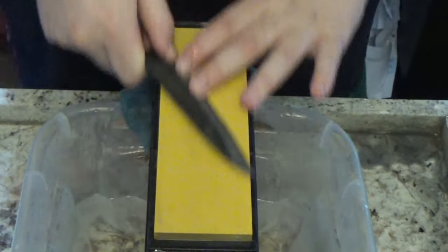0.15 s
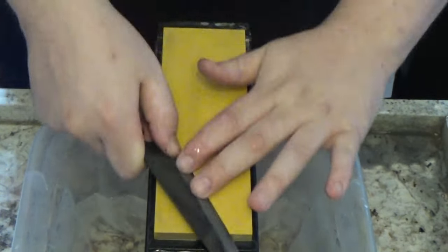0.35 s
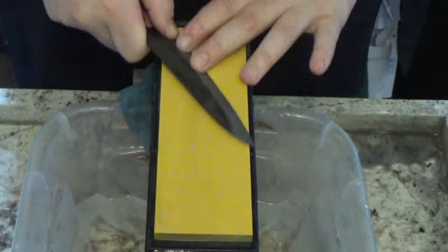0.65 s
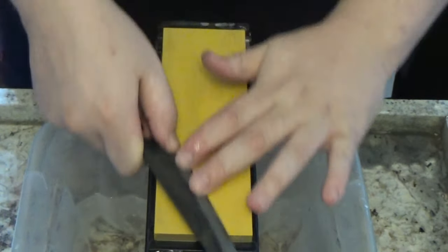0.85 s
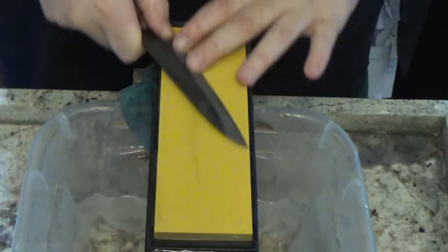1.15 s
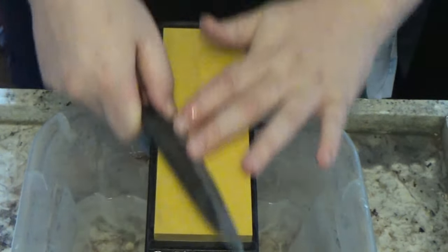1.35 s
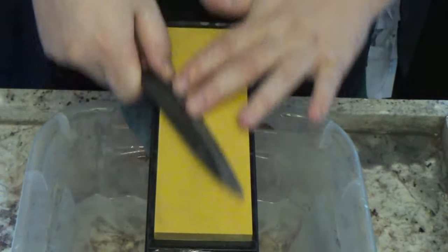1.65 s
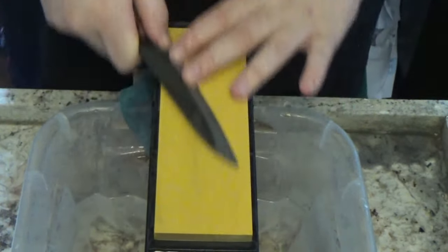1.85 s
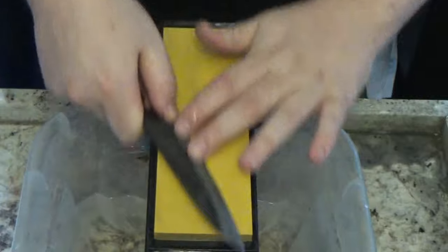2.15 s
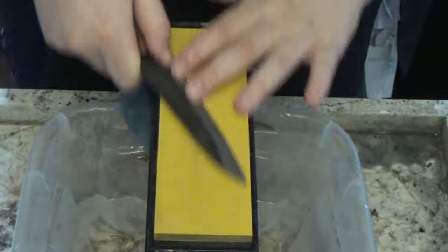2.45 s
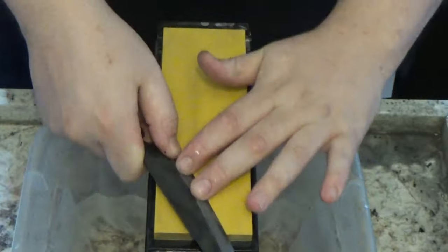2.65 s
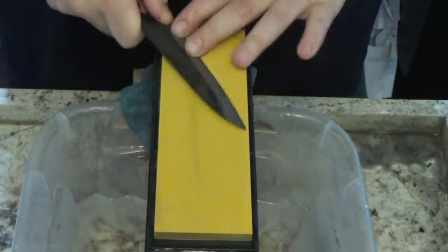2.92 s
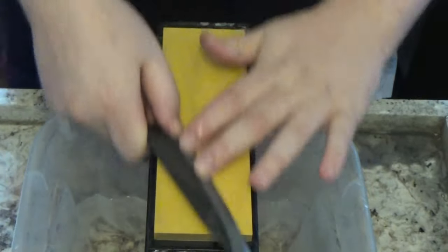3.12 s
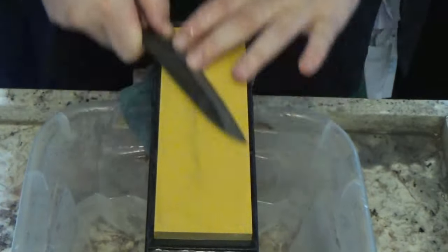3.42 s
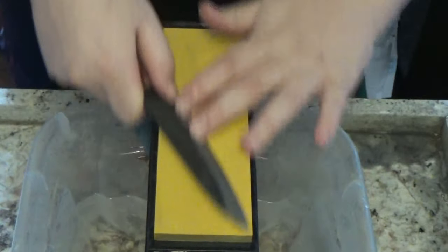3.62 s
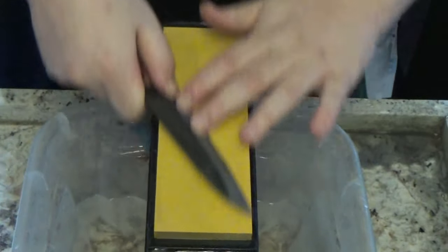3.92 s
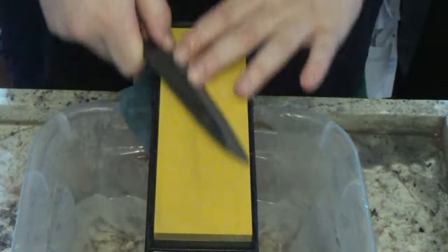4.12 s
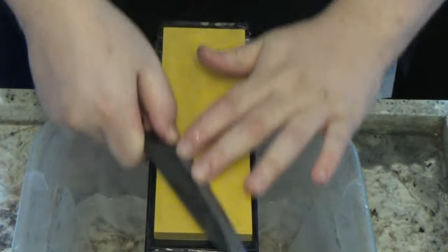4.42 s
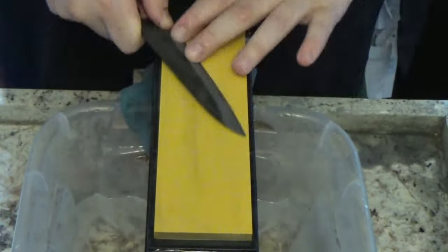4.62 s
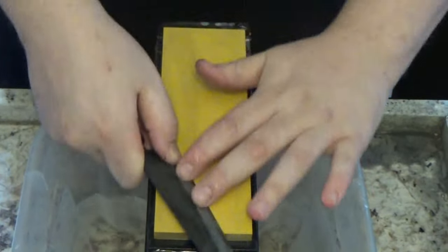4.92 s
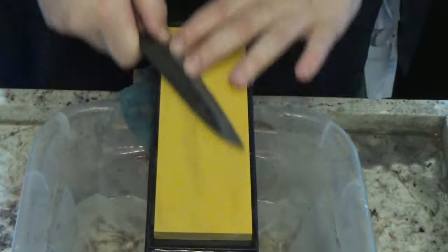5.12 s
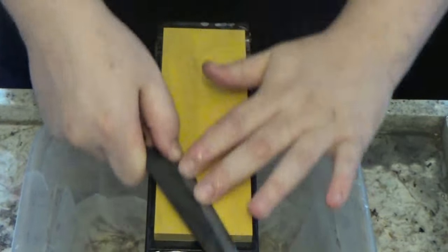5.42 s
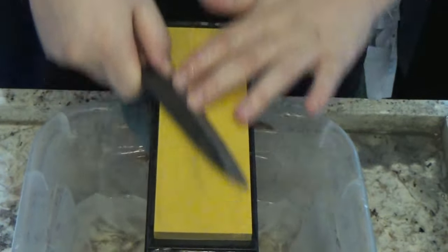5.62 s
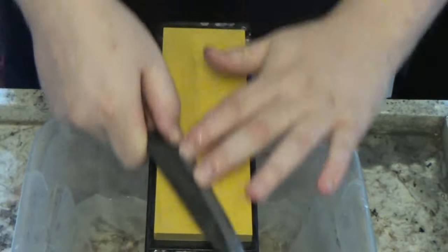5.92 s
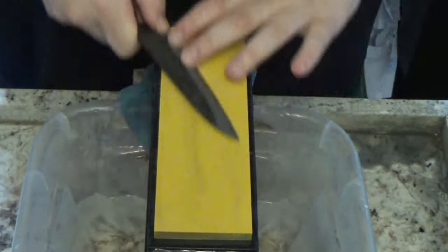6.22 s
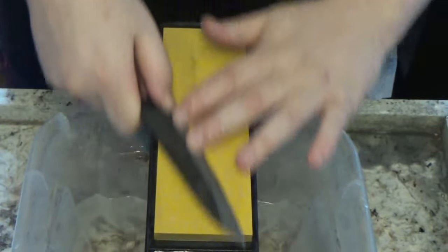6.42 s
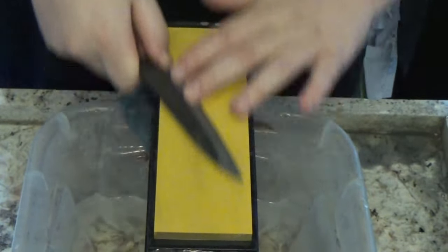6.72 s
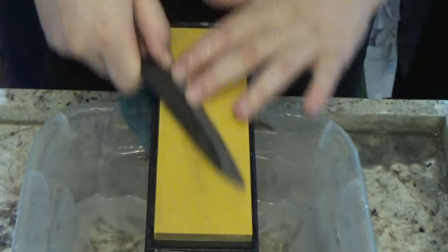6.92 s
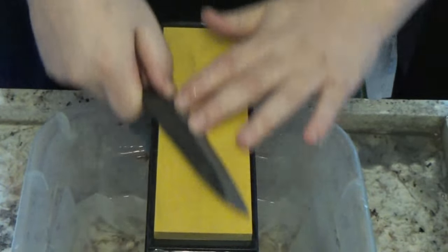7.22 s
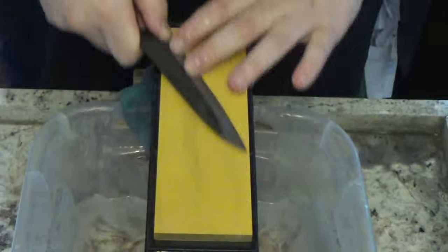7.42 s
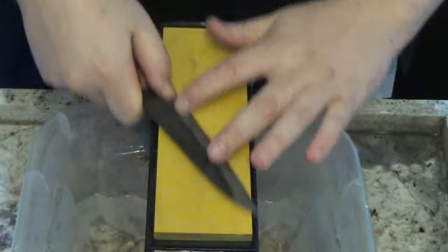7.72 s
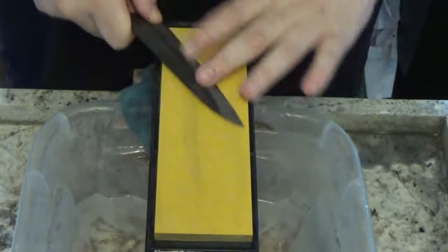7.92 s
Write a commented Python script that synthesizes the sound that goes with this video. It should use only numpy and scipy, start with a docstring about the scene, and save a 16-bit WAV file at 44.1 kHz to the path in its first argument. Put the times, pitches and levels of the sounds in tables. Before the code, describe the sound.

Close and centred, a steel blade rasps to and fro over a wet sharpening stone in a quick, even rhythm. Every push and pull swells into a hissing scrape with shifting metallic overtones, and now and then the edge catches on grit with a tiny tick. The strokes continue throughout, while a motor hums quietly in the small kitchen.

```python
"""On a kitchen counter, a knife is pushed to and fro on a wet whetstone over a plastic tub.
Grit scratches the steel and makes blade and stone ring; the ringing glides as the blade travels.
The scraping swells once in each stroke and almost stops at each turn.
Behind it a motor drones and the room rumbles softly."""
import sys
import numpy as np
from scipy import signal
from scipy.fft import rfft, irfft, next_fast_len
from scipy.io import wavfile
from scipy.ndimage import uniform_filter1d, map_coordinates

SR = 44100
rng = np.random.default_rng(int(sys.argv[2]) if len(sys.argv) > 2 else 0)


def file_out(sig):
    """Save sig as 16-bit WAV at sys.argv[1]."""
    # one column per channel
    cols = np.atleast_2d(sig).T
    # limit, then scale
    lim = np.clip(cols, -1, 1)
    pcm = np.round(lim * 32767).astype(np.int16)
    wavfile.write(sys.argv[1], SR, pcm)


N = 355446
TIME = np.arange(N) / SR


def gain_of(db):
    """Turns decibels into a number to multiply by."""
    return 10 ** (np.asarray(db) / 20)


def evened(x):
    """Scales a signal to an average power of 1."""
    return x / np.sqrt(np.mean(x ** 2) + 1e-20)


def bell(distance):
    """A smooth bump of height 1."""
    return np.exp(-np.minimum(distance ** 2, 50))


def read(points, hz):
    """Looks up values between rows of frequency and value, on a musical pitch scale."""
    row_hz, value = np.transpose(points)
    return np.interp(np.log(hz + 1), np.log(row_hz + 1), value)


def colour(x, points):
    """Turns frequencies up or down, following rows of Hz and dB."""
    size = next_fast_len(N + 4096)
    gain = gain_of(read(points, np.fft.rfftfreq(size, 1 / SR)))
    return irfft(rfft(x, size) * gain, size)[..., :N]


def wander(rate_hz):
    """A smooth random wobble of about size 1, up to roughly rate_hz times a second."""
    hz = np.fft.rfftfreq(N, 1 / SR)
    return evened(irfft(rfft(rng.standard_normal(N)) * np.exp(-(hz / rate_hz) ** 2), N))


# The tone of the rumble. Each row: frequency in Hz, relative level in dB.
RUMBLE_TONE = [(22, -3.5), (40, -12), (65, -3.5), (85, -0.5), (140, 1.5), (175, -5), (280, -5),
               (400, -10.5), (700, -11), (1000, -17.5), (2000, -22.5), (5000, -17.5), (15000, -42)]
# How alike the ears hear it. Each row: frequency in Hz, likeness from 0 to 1.
RUMBLE_LIKENESS = [(30, 0.96), (70, 1), (180, 0.98), (350, 0.81), (700, 0.65), (1500, 0.51), (6000, 0.91)]
def rumble(level_db=-48.0):
    """Steady room noise, alike in both ears in the bass."""
    left, other = rfft(rng.standard_normal((2, N)))
    likeness = read(RUMBLE_LIKENESS, np.fft.rfftfreq(N, 1 / SR))
    right = likeness * left + np.sqrt(1 - likeness ** 2) * other
    pair = irfft(np.array([left, right]), N)
    return gain_of(level_db) * evened(colour(pair, RUMBLE_TONE))


# Each row: pitch in Hz, level in dB, size of the waver in Hz.
KITCHEN_HUMS = [(58.7, -68, 2.3), (121.6, -54, 3.05), (235.3, -53, 0.12), (351, -64, 3.97)]
def hums(waver_rate_hz=10.03):
    """The kitchen's faint hums: pure tones that waver a little."""
    out = np.zeros(N)
    for hz, db, waver_hz in KITCHEN_HUMS:
        cycles = np.cumsum(hz + waver_hz * wander(waver_rate_hz)) / SR
        out += gain_of(db) * np.sin(2 * np.pi * cycles)
    return np.sqrt(2) * out


# How the motor runs. Each row: time in seconds, pitch in Hz, level in dB, overtone boost in dB.
MOTOR_RUN = [(0, 98.4, -42.5, -3), (.6, 96, -42.5, -3), (.95, 96.7, -42, -3), (1.4, 97.6, -44, -8),
             (2.101, 96.9, -42.5, -3), (2.7, 97.2, -40.5, 0), (2.95, 97.2, -40, 0),
             (3.55, 96.6, -42.5, 7.5), (3.95, 98, -43, 3), (4.951, 96.7, -42, 0), (5.4, 97.7, -42, 0),
             (5.65, 98.7, -45.5, 1), (6, 97.7, -42, 4), (6.4, 98.4, -45.5, 9), (6.8, 101.8, -50, 11.5),
             (7.1, 100.6, -45.5, 9), (7.6, 100.8, -50, 11), (8.06, 98.8, -60, 9)]
# Its tones. Each row: multiple of the pitch, relative level in dB.
MOTOR_TONES = [(1, -0.5), (2, -19), (3, -24)]
def motor(flutter_db=0.5, flutter_hz=8, waver_hz=0.38):
    """A motor drones; its pitch wanders with its speed and its tones flutter in level."""
    times, *columns = np.transpose(MOTOR_RUN)
    hz, level_db, overtone_db = (np.interp(TIME, times, column) for column in columns)
    turns = np.cumsum(hz + waver_hz * wander(8.5)) / SR
    out = np.zeros(N)
    for multiple, tone_db in MOTOR_TONES:
        db = level_db + tone_db + overtone_db * (multiple > 1) + flutter_db * wander(flutter_hz)
        out += gain_of(db) * np.sin(2 * np.pi * multiple * turns)
    return np.sqrt(2) * out


# How long the kitchen echoes. Each row: frequency in Hz, seconds to fade by 60 dB.
ROOM_FADE = [(300, .3), (1500, .26), (4000, .13), (15000, .08)]
# How loudly it echoes. Each row: frequency in Hz, level of the sound fed to the echo in dB.
ROOM_FEED = [(500, -4.5), (1500, -10), (3000, -13), (5000, -17), (7500, -20), (10000, -73), (15000, -61)]
def room(x, fade_in_s=0.0036, echoes_per_s=4000):
    """The hard kitchen sends each ear many small echoes, the treble dying first."""
    shape = (2, SR // 2)
    echoes = rng.choice([-1., 1.], shape) * (rng.random(shape) < echoes_per_s / SR)
    hz, t, spectrum = signal.stft(echoes, SR, nperseg=256)
    fade = gain_of(-60 * t / read(ROOM_FADE, hz)[:, None]) * np.tanh(t / fade_in_s)
    tail = signal.istft(spectrum * fade, SR, nperseg=256)[1]
    tail /= np.linalg.norm(tail, axis=1, keepdims=True)
    return signal.fftconvolve(colour(x, ROOM_FEED)[None], tail, axes=1)[:, :N]


# Each row: delay in seconds with the blade at the stone's far end, the same at its near end, strength.
CLOSE_ECHOES = [(.0021, 0.0012, 0.15), (.0043, 0.0029, -.22), (.0078, .0071, 0.17)]
def close_echoes(x, place):
    """Sound bounces off tub, counter and hands; the delays shift as the blade moves."""
    return sum(gain * np.interp(TIME - near - (far - near) * place, TIME, x)
               for far, near, gain in CLOSE_ECHOES)


# Each row: frequency in Hz, boost or cut in dB.
RASP_TONE = [(150, -45), (500, -16), (1100, -22.5), (2200, -18.5), (2700, -6.5), (3300, -10), (3700, -5),
             (5500, -1), (7000, -3.5), (8800, -1.5), (9800, 2.5), (12500, 2.2), (14500, -1), (15800, -10)]
def rasp(x):
    """Gives a sound the bright tone of grit on steel."""
    return colour(x, RASP_TONE)


# Each row: start in seconds, level in dB before the rasp's tone is applied, fade time in seconds.
GRAIN_CRACKS = [(1.1853, -21, .0005), (4.5915, -21, 0.00063), (5.1988, -25, .0006), (5.7545, -27, 0.00098),
                (6.0235, -28, .0012), (6.1385, -17, .0006)]
def cracks(samples=600):
    """Loose grains crack under the edge, each a tiny dying burst of noise."""
    t, out = np.arange(samples) / SR, np.zeros(N)
    for start, db, fade_s in GRAIN_CRACKS:
        burst = rng.standard_normal(samples) * np.exp(-t / fade_s)
        out[round(start * SR):][:samples] += gain_of(db) * burst
    return rasp(out)


# The strokes, pull and push by turns. Each row: start in seconds, starting place (0 near end, 1 far),
# first grab from 0 to 1, coasting time in seconds, level in dB, rise from start to end in dB,
# swell in dB, its delay in seconds, its half length in seconds, brightness in dB,
# extra brightness in the swell in dB.
ARM_STROKES = [(-0.157, 0.0, 0.3, 0.036, -36.5, -6, 8.5, 0.19, 0.039, 1.5, -2),
               (0.124, 0.77, 0.0, 0.056, -31.5, -4, 3, 0.104, 0.022, 0.2, 0),
               (0.406, 0.02, 0.15, 0.036, -32.5, -6.5, 2.4, 0.14, 0.025, -1.3, -5),
               (0.678, 0.85, 0.0, 0.068, -32.5, 2.4, 6.5, 0.095, 0.056, 1, 1),
               (0.964, 0.0097, 0.01, 0.026, -34.5, -8, 2.5, 0.17, 0.0089, -0.2, -2),
               (1.247, 1, 0.74, 0.064, -33, 5.5, 3.7, 0.12, 0.035, 1.3, -1),
               (1.535, 0, 0.1, 0.023, -36.5, -1, 2, 0.14, 0.028, -1.3, 2),
               (1.827, 0.91, 0.59, 0.056, -36, 2, 7, 0.14, 0.032, 0.9, -2.5),
               (2.114, 0.12, 0.05, 0.017, -34.5, 5.5, 7.5, 0.17, 0.063, 0, -2),
               (2.395, 0.94, 0.24, 0.033, -32.5, -13.5, 8, 0.12, 0.065, -0.5, -2.2),
               (2.699, 0.013, 0.0, 0.018, -33.5, 3, 6.5, 0.13, 0.052, 1.2, -3),
               (2.977, 0.85, 0.7, 0.056, -32.5, 0, 5.5, 0.11, 0.049, -0.5, 1),
               (3.255, 0.046, 0.6, 0.062, -28.5, 11, 4, 0.14, 0.037, 1.2, -0.5),
               (3.529, 0.89, 0.56, 0.058, -30.7, 0, 7.3, 0.128, 0.042, 1.5, -2),
               (3.825, 0.027, 0.0, 0.024, -33.5, -2, 7.2, 0.17, 0.044, -1, 3),
               (4.111, 0.94, 0.0, 0.046, -30.5, -6.5, 6, 0.12, 0.02, 1.5, 0),
               (4.396, 0.0, 0.1, 0.013, -32.5, 2.1, 6.5, 0.18, 0.023, 1, 0.2),
               (4.684, 0.96, 0.99, 0.023, -35, -3, 6.5, 0.197, 0.034, -0.5, 1.5),
               (4.966, 0.027, 0.84, 0.017, -34.5, 6.5, 5.0, 0.103, 0.048, 0.2, 0),
               (5.236, 0.93, 1.0, 0.053, -34, 1, 2.3, 0.066, 0.014, -1.7, 2),
               (5.516, 0.0, 0.1, 0.025, -33, -4, 6, 0.18, 0.021, 0, -1),
               (5.783, 0.96, 0.9, 0.036, -36.5, 3, 4.5, 0.086, 0.044, 0.3, -4),
               (6.052, 0.0, 0.47, 0.02, -35.5, 1.5, 10.5, 0.18, 0.038, 0, 0.5),
               (6.322, 1.0, 1.0, 0.046, -34, 5, 5, 0.087, 0.024, 1.5, -3),
               (6.603, 0.023, 0, 0.07, -31, 3.5, 5.5, 0.18, 0.015, -0.5, 0),
               (6.876, 0.93, 1.0, 0.031, -38, -1.5, 9.5, 0.13, 0.086, 3.5, -2.5),
               (7.145, 0.013, 0.0, 0.04, -31, -2, 5.5, 0.18, 0.026, 0.3, 3),
               (7.426, 0.98, 0.43, 0.03, -33.5, -6, 8, 0.19, 0.02, 1.2, 2),
               (7.685, 0.055, 0.73, 0.041, -33, -4, 9, 0.22, 0.059, 2.7, -2),
               (7.951, 0.91, 0.03, 0.04, -31, -1.7, 3.5, 0.069, 0.05, -0.5, 1)]
def progress(last_stroke_s=.272):
    """Which stroke is under way, the seconds since its start and the seconds until its end."""
    starts = np.transpose(ARM_STROKES)[0]
    ends = np.append(starts[1:], starts[-1] + last_stroke_s)
    stroke = np.maximum(np.searchsorted(starts, TIME) - 1, 0)
    return stroke, abs(TIME - starts[stroke]), abs(ends[stroke] - TIME)


def swing(rest_near=0.047, rest_far=0.084, steepness=1.74, grab_s=0.0069, gather_s=0.03):
    """The arm swings: gives place on the stone, speed and how freely the blade slides, all 0 to 1."""
    stroke, since, until = progress()
    turn, grab, coast_s = np.transpose(ARM_STROKES)[1:4]
    travel = np.append(turn[1:], 0) - turn
    angle = np.pi * since / (since + until)
    place = turn[stroke] + travel[stroke] * (1 - np.cos(angle)) / 2
    # the blade coasts to a stop, sticks, breaks loose and gathers speed
    stopping = np.tanh((until / coast_s[stroke]) ** steepness)
    starting = np.tanh((since / grab_s) ** 2) * (1 - (1 - grab[stroke]) * np.exp(-since / gather_s))
    # it never quite comes to rest, least of all at the far end
    rest = rest_near + (rest_far - rest_near) * place
    return place, np.sin(angle), rest + (1 - rest) * stopping * starting


# The edge's tone along a pull and a push. Each row: share of the stroke from 0 to 1, brightness in dB.
PULL_TONE = [(0, -1.5), (.33, 5.5), (.56, -0.3), (.7, 0), (1, 0.5)]
PUSH_TONE = [(0, 3), (.22, -0.5), (.33, 1), (.75, .7), (1, -1.5)]
def pressure(flatness=1.82, unsteady_db=0.8, unsteady_hz=20):
    """The hand bears down once a stroke: gives how hard the edge bites and how bright it is, in dB."""
    stroke, since, until = progress()
    level, rise, swell_db, swell_at, swell_s, bright, swell_bright = np.transpose(ARM_STROKES)[4:, stroke]
    share = since / (since + until)
    swell = bell(abs((since - swell_at) / swell_s) ** flatness)
    bite = level + rise * (share - .5) + swell_db * swell + unsteady_db * wander(unsteady_hz)
    pull, push = (np.interp(share, *np.transpose(tone)) for tone in (PULL_TONE, PUSH_TONE))
    return bite, np.where(stroke % 2, push, pull) + bright + swell_bright * swell


def grit(speed, grains_per_s=9000, size_db=3.0, slurry=0.78, chatter_db=1.34, clump_db=1.0):
    """Grains hit the edge, more often at speed, over the hiss of wet paste; the contact chatters."""
    density = 0.27 + speed
    hits = rng.random(N) < density * grains_per_s / SR
    sizes = gain_of(size_db * np.minimum(rng.exponential(1, N), 5)) * rng.choice([-1, 1], N)
    scratch = evened(hits * sizes / np.sqrt(density)) + slurry * rng.standard_normal(N)
    return evened(scratch * gain_of(chatter_db * wander(580) + clump_db * wander(35)))


# The ringing tones. Each row: pitch in Hz at the far end and at the near end, width in Hz,
# then boost in dB at the far end, midway and at the near end.
BLADE_TONES = [(740, 760, 45, 8.5, 16, 6.5), (1350, 1375, 115, 7.5, 10, 10), (1790, 1873, 113, 6, 13, 16),
               (2820, 2980, 69, 3.5, 2, 8), (3670, 3601.0, 147, -2, 8, 10),
               (4180, 3650, 360, 10.5, 6.5, 3.5), (4530, 4240, 370, -6.5, -8, 4),
               (5015, 4670, 480, 11, 11, 8.5), (5940, 5930, 360, -2.5, 8, 8),
               (6420, 6840, 270, 1.5, 3.5, 10.5), (7286.0, 7840, 250, 8.5, 7.5, 1.5),
               (8910, 10020, 1140, 7, 1.5, 6.5), (10400, 11700, 990, 2, 1, 2.5)]
def ringing(x, place):
    """Blade and stone ring at their own pitches, which glide as the blade travels."""
    for far_hz, near_hz, width_hz, far_db, mid_db, near_db in BLADE_TONES:
        hz = near_hz + (far_hz - near_hz) * place
        spin = np.exp(2j * np.pi * np.cumsum(hz) / SR)
        decay = np.exp(-np.pi * width_hz / SR)
        # shift the gliding pitch down to 0 Hz, smooth it, and shift it back
        band = 2 * (spin * signal.lfilter([1 - decay], [1, -decay], x * spin.conj())).real
        boost = gain_of(np.interp(place, [0, .5, 1], [near_db, mid_db, far_db]))
        x = x + (boost - 1) * band
    return x


# How much the steel's tones come and go. Each row: frequency in Hz, typical swing in dB.
FLICKER_DEPTH = [(600, 1.5), (2500, 2.8), (4500, 3.3), (7000, 3.1), (10000, 2.4), (15000, 1.9)]
def flicker(t, hz, place, life_s=.021, width_hz=150, glide=.04):
    """Brief random peaks and dips, in dB, that slide in pitch with the blade."""
    patch = np.outer(bell((hz[:21] - hz[10]) / width_hz), bell((t[:61] - t[30]) / life_s))
    patches = signal.fftconvolve(rng.standard_normal((len(hz), len(t))), patch, "same")
    bins, frames = np.indices(patches.shape)
    gliding = map_coordinates(patches, [bins * (1 - glide * place), frames], order=1, mode="nearest")
    return read(FLICKER_DEPTH, hz)[:, None] * evened(gliding)


# Brief rings. Each row: time in seconds, pitch in Hz, boost in dB.
BRIEF_RINGS = [(0.157, 5040, 14), (1.956, 10240, 16), (2.293, 4220, 13), (2.485, 5000, 6), (2.833, 4700, 5),
               (3.129, 5380, 16), (3.396, 6200, 12), (3.692, 6560, 15), (4.151, 5100, 8), (4.232, 7900, 17),
               (5.254, 4420, 8), (6.3, 4300, 7), (5.584, 8600, 15), (6.217, 5400, 11.5),
               (7.018, 7920.0, 23), (7.488, 4733, 15), (7.779, 5100, 24), (7.918, 3360.0, 18)]
# Rings at the stone's far end. Each row: pitch in Hz, width in Hz, boost in dB.
FAR_RINGS = [(2770, 100, 9.5), (3380, 110, 10), (4270, 144, 11)]
def singing(t, hz, place, ring_s=0.027, ring_hz=130, far_reach=0.1):
    """The steel sings out for moments, and most freely at the far end: gives boosts in dB."""
    at, pitch, boost = np.transpose(BRIEF_RINGS)
    brief_db = (boost * bell((hz[:, None] - pitch) / ring_hz)) @ bell((t - at[:, None]) / ring_s)
    far_db = sum(db * bell((hz - centre) / width) for centre, width, db in FAR_RINGS)
    return brief_db + np.outer(far_db, bell((1 - place) / far_reach))


# The blade's tilt. Each row: time in seconds, shift toward a hollow scrape in dB.
BLADE_TILT = [(0, 0), (.6, -1.5), (1.2, 0), (2.2, 2.5), (3.4, 0), (4.2, 2), (4.7, 2), (5.6, 1), (6.3, 0.5),
              (6.9, 4), (7.5, 4), (8.06, 3)]
def contact(x, place, speed, bite, bright, dull_db=-6.5, body_lag=0.31):
    """Fingers and point of contact keep changing which of the steel's tones ring freely."""
    hz, t, spectrum = signal.stft(x, SR, nperseg=512, noverlap=384)
    place, speed, bite, bright = (np.interp(t, TIME, curve) for curve in (place, speed, bite, bright))
    db = flicker(t, hz, place) + singing(t, hz, place)
    # the treble follows the touch; a slow blade loses the very top
    db += np.outer(read([(6000, 0.16), (9000, 0.92)], hz), bright)
    db += np.outer(read([(6000, 0), (15000, 1.0)], hz), dull_db * (1 - speed))
    # a harder bite raises the stone's low body less than the hiss of the edge
    db -= np.outer(read([(2200, 1), (3600, 0.076)], hz), body_lag * (bite - bite.mean()))
    # tilting trades that body for a hollow scrape
    hollow = read([(700, -1), (1900, -0.76), (2500, 1), (3300, 0.12), (4000, 0.049)], hz)
    db += np.outer(hollow, np.interp(t, *np.transpose(BLADE_TILT)))
    return signal.istft(spectrum * gain_of(db), SR, nperseg=512, noverlap=384)[1][:N]


# The edge catches on coarse grit. Each row: time in seconds, boost in dB, half length in seconds.
EDGE_CATCHES = [(1.126, 3.5, .006), (1.182, 5, .0036), (1.277, 6.5, .007), (2.071, 7.5, 0.0059),
                (2.143, 9.5, 0.0037), (2.578, 3, .011), (2.895, 4.5, .007), (3.067, 2, .005),
                (3.126, 2.5, .007), (3.514, 3, 0.0056), (3.564, 1.5, .007), (3.897, 4, .004),
                (4.494, 4, .004), (4.593, 2.5, 0.0054), (5.118, 6, .004), (5.19, 5, .012),
                (5.583, 6, 0.0035), (5.807, 7.5, 0.0063), (6.08, 7, .004), (6.291, 4.5, .0035),
                (6.507, 4.5, .005), (6.535, 4, .011), (7.493, 5, 0.005), (7.522, 3.5, .011)]
def blade():
    """The knife scrapes along the stone: grit sets it ringing and the hand sets the loudness."""
    place, speed, sliding = swing()
    bite, bright = pressure()
    scrape = ringing(rasp(grit(speed)), place)
    scrape = contact(scrape, place, speed, bite, bright)
    scrape += close_echoes(scrape, place)
    # even out the level, so it does not depend on which tones are strong
    scrape /= np.sqrt(uniform_filter1d(scrape ** 2, size=1800) + 1e-12)
    catch_db = sum(boost * bell((TIME - at) / half_s) for at, boost, half_s in EDGE_CATCHES)
    return scrape * sliding * gain_of(bite + catch_db)


# The knife in the two ears. Each row: frequency in Hz, left level minus right level in dB.
EAR_BALANCE = [(700, -.7), (1400, -.3), (2500, .3), (4500, .8), (7500, .05), (11000, 0)]
def scene(rumble_left_db=-0.36, rumble_right_db=0.3):
    """The knife close up in the middle, the kitchen around it."""
    knife = blade() + cracks()
    direct = np.array([colour(knife, [(hz, side * db / 2) for hz, db in EAR_BALANCE])
                       for side in (1, -1)])
    rumble_gains = gain_of([[rumble_left_db], [rumble_right_db]])
    return direct + room(knife) + motor() + hums() + rumble() * rumble_gains


def record(dry):
    """Cuts away the very highest treble, above 15950 Hz."""
    low_pass = signal.firwin(511, 15950, window=("kaiser", 9), fs=SR)
    return signal.oaconvolve(dry, low_pass[None], "same")


dry = scene()
out = record(dry)
file_out(out)
```